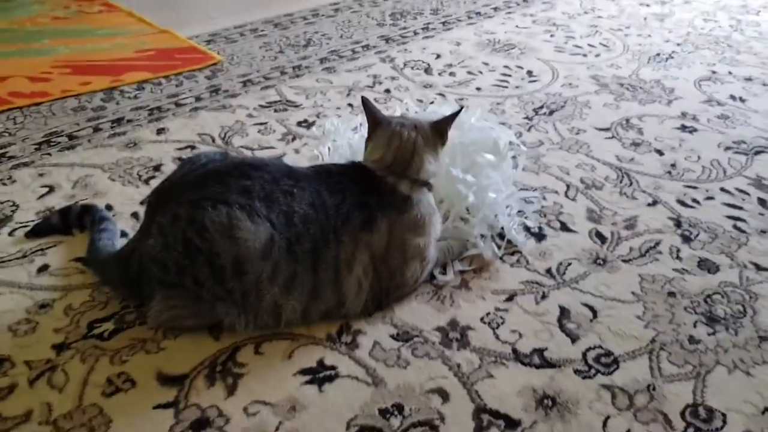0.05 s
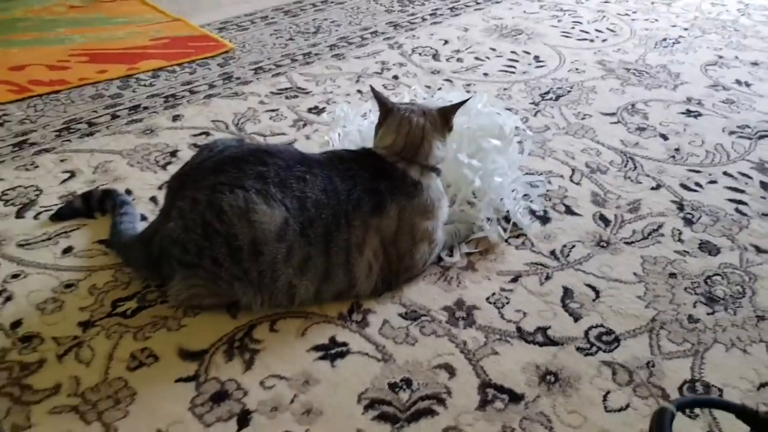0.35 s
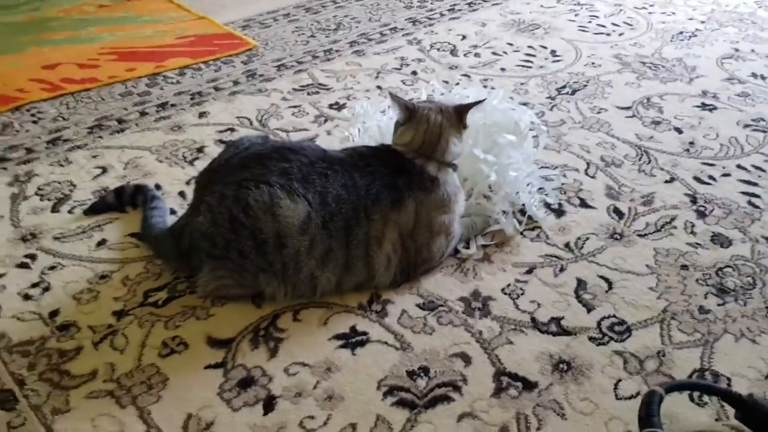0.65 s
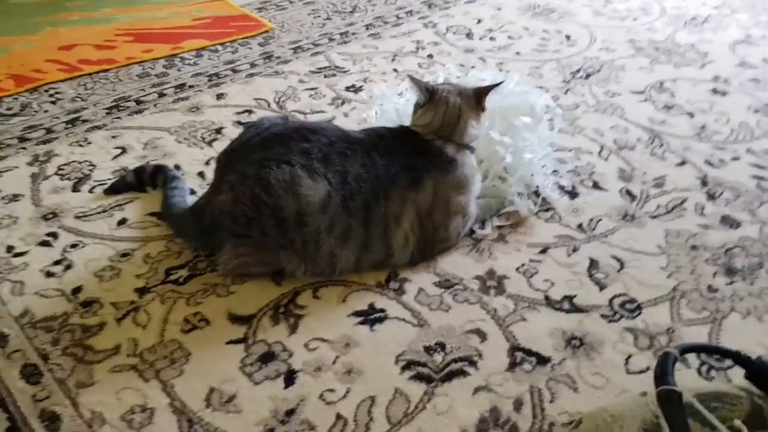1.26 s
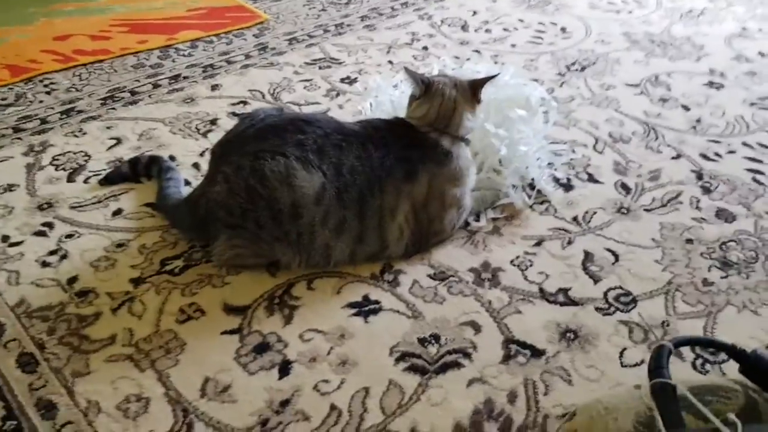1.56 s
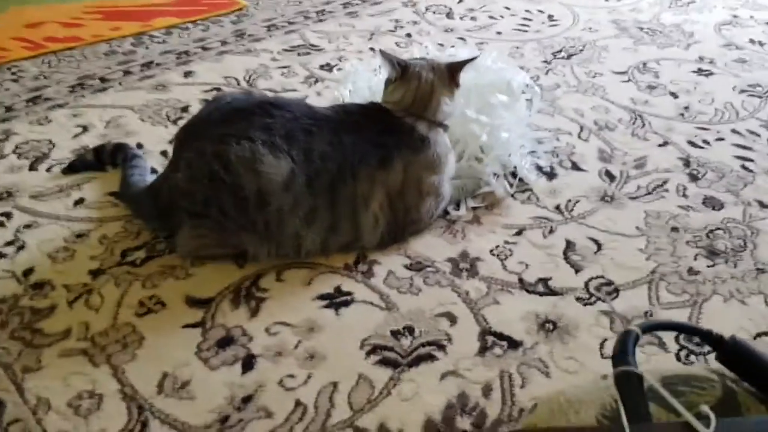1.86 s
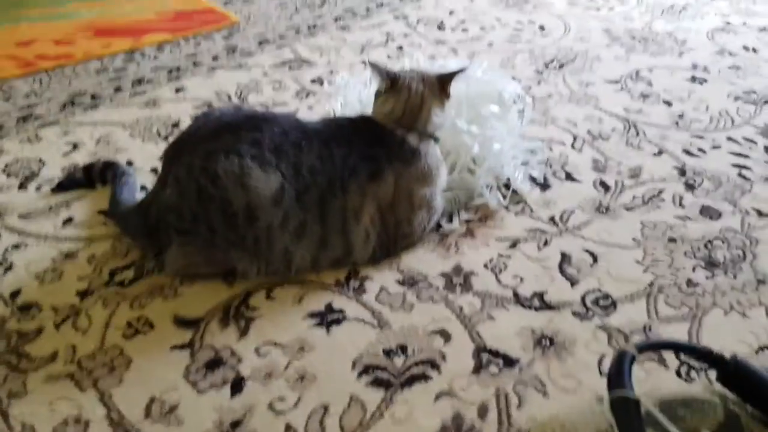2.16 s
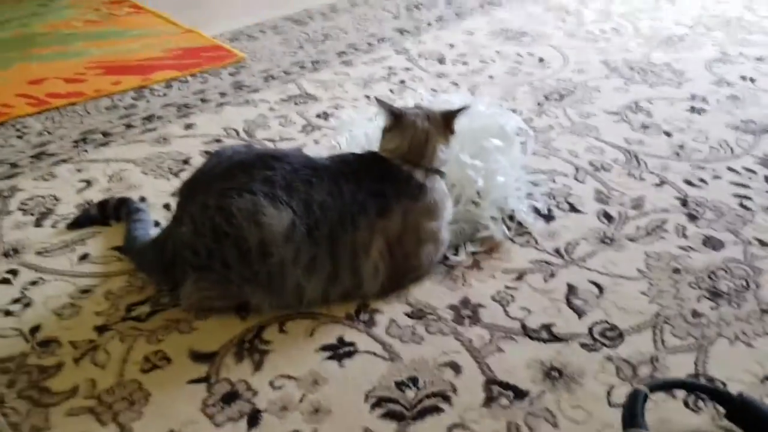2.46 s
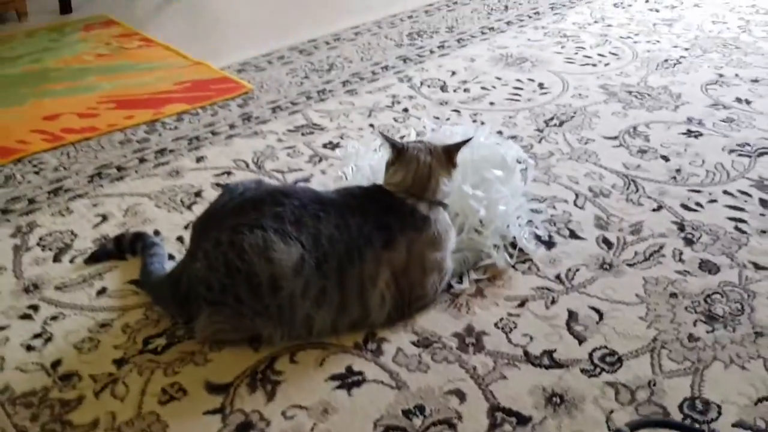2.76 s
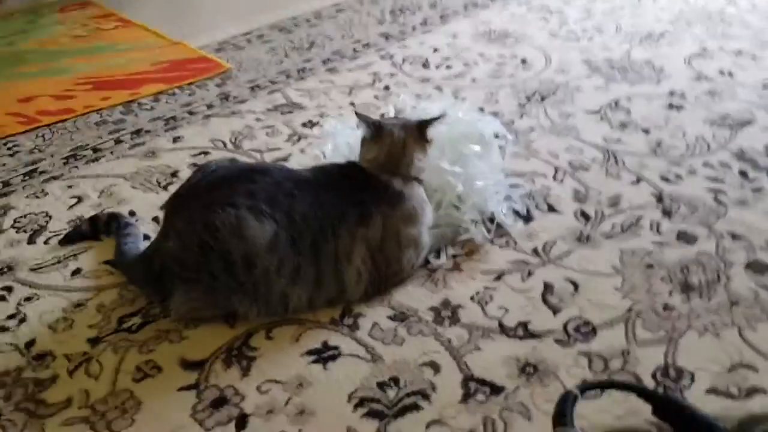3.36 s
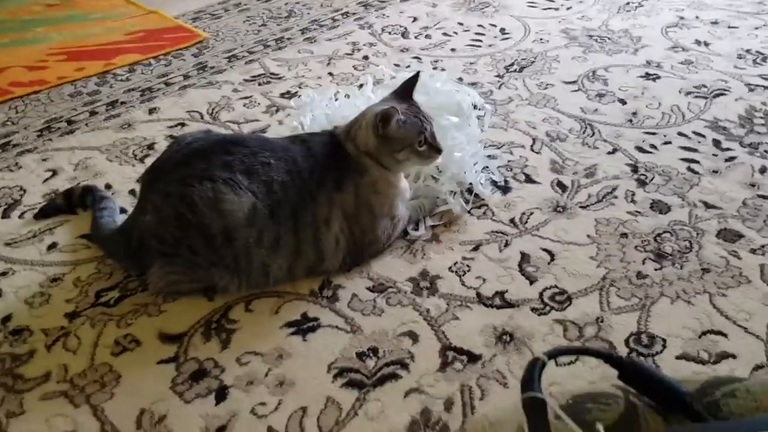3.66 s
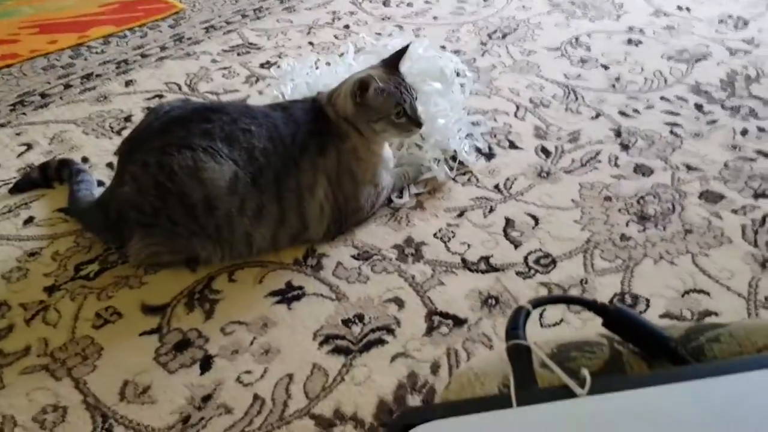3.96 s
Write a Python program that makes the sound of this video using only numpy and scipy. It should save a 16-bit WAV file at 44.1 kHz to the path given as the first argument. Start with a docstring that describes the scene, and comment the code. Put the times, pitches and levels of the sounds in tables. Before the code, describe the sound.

Crinkly packing material rustles close by from the start, with small crackles, soft rubbing and dull low knocks as a cat lies against it. The rustle dies away around 1.8 seconds, leaving a few faint ticks in a quiet carpeted room. From about 3 seconds a second rustle swells to one loud crunch near 3.3 seconds, then fades into light crackles and scrapes by 4 seconds.

```python
"""A quiet carpeted room, close to a cat lying against a heap of crinkly packing material.
A long rustle dies away, a few faint ticks follow, then a second rustle swells to one loud crunch.
The rustle is a swarm of tiny slips between strands. Buckling strands crackle and flicked ones ring.
Dull low knocks and soft rubbing sound close by, over a short echo and faint room tone."""
import sys
import numpy as np
from scipy import signal
from scipy.fft import rfft, irfft
from scipy.io import wavfile
from scipy.ndimage import uniform_filter1d

SR = 44100
rng = np.random.default_rng(int(sys.argv[2]) if len(sys.argv) > 2 else 0)


def transcribe(signal):
    """Save signal, clipped to [-1, 1], as a 16-bit WAV file at the path in sys.argv[1]."""
    frames = np.atleast_2d(signal).T
    limited = np.clip(frames, -1, 1)
    pcm = np.round(limited * 32767).astype(np.int16)
    wavfile.write(sys.argv[1], SR, pcm)


N = 176400
LOW_HZ, TREBLE_HZ = 616, 6770  # low/mid and mid/treble crossovers
SLIDE_RISE_S, SLIDE_FALL_S = 0.0063, 0.0075  # scrapes and rubs


def rustle(flutter_hz=80):
    """Strands rub and scrape over each other; friction catches and lets go many times a second."""
    # Each row: time in seconds, then low, mid and treble level in dB before trim.
    levels = [(0, -36, -30, -32), (0.07, -44.5, -36.5, -48.5), (0.14, -35, -31.5, -37.5),
              (0.28, -41.5, -35, -42.5), (0.345, -41.5, -34.5, -40), (0.45, -33, -36, -46.5),
              (0.58, -37.5, -35, -38), (0.7, -40, -34, -39), (0.898, -42, -39, -44),
              (1.0, -33.5, -33.5, -35), (1.07, -38.5, -34.5, -42.5), (1.25, -33.5, -32, -38),
              (1.55, -39.5, -32, -36.5), (1.64, -35, -32, -38), (1.71, -48, -42, -50),
              (1.77, -50, -49, -57), (1.807, -52, -42, -51), (1.88, -57.5, -63, -72.5),
              (2.201, -58.5, -56.5, -65.5), (2.4, -59, -61.5, -74), (2.56, -57, -54, -59.5),
              (2.72, -53, -50, -55), (2.78, -54, -52.5, -63.5), (2.99, -46.5, -52, -60.5),
              (3.03, -50, -45.5, -60.5), (3.13, -44.5, -51, -65.0), (3.21, -38.5, -32.5, -41.6),
              (3.31, -35.5, -31.5, -35.5), (3.353, -28.5, -17.5, -26), (3.389, -30, -25.5, -31),
              (3.45, -34, -28.5, -33.5), (3.498, -42, -36.5, -41.5), (3.59, -47.5, -44.5, -52),
              (3.71, -48.5, -41.5, -54), (3.88, -41.5, -45, -55), (3.92, -55.5, -50, -60.5),
              (3.99, -52, -57, -73)]
    # Each row: start in seconds, length in seconds, mid and treble level in dB before trim.
    scrapes = [(0.187, 0.055, -38.5, -46), (0.36, 0.039, -27, -32), (0.467, 0.065, -30.5, -34),
               (0.984, 0.013, -47, -41), (1.933, 0.065, -60, -69), (3.605, 0.046, -43.5, -42.5),
               (3.752, 0.1, -42, -43)]
    trims_db, flutters_db = (-1.5, -3, 1.5), (2.44, 1.02, 1.24)  # low, mid, treble
    times, *bands_db = np.transpose(levels)
    t, catch = np.arange(N) / SR, wobble(flutter_hz)
    bands = [band * amp(trim_db + flutter_db * evened(catch + wobble(flutter_hz)))
             for band, trim_db, flutter_db in zip(slips(share=0.35), trims_db, flutters_db)]
    out = sum(band * amp(np.interp(t, times, db)) for band, db in zip(bands, bands_db))
    _, mid, treble = bands
    for start, length, mid_db, treble_db in scrapes:
        shape = burst(length, SLIDE_RISE_S, SLIDE_FALL_S)
        add(out, start, cut(mid, start, shape) * amp(mid_db) + cut(treble, start, shape) * amp(treble_db))
    return out


def slips(share, rate_hz=450, decay_s=0.00052):
    """Tiny slips carry `share` of the power, hiss the rest; gives low, mid and treble at unit rms."""
    # Rustle spectrum. Each row: frequency in Hz, left and right relative level in dB.
    colour = [(30.4, -22, -8), (90.6, 5.5, -1), (232, 2, -0.5), (452, -2, -5), (596, -8.5, -10.5),
              (875, -3, -9), (1350, -1, -4), (1990, -1.5, -3.5), (3100, -3.5, -2), (4380, -3.5, -6.5),
              (5580, -7, -15.5), (6620, -12, -18), (8950, -20.5, -16.5), (11450, -14.5, -17),
              (13100, -13.5, -21.5), (15100, -18, -26.5)]
    # Steady resonances. Each row: centre in Hz, width in Hz, lift in dB.
    resonances = [(427, 85, 1), (503, 38, 4.5), (640, 86, -3.5), (923, 92, 4.5), (3030, 85, -1.5)]
    sizes_db = np.minimum(rng.exponential(1, N), 4)
    impulses = amp(sizes_db) * (rng.random(N) < rate_hz / SR)
    power = signal.lfilter([1], [1, -np.exp(-1 / (decay_s * SR))], impulses ** 2)
    drive = np.sqrt(1 - share + share * power / power.mean()) * rng.standard_normal((2, N))
    lift_db = sum(db * resonance(hz, width_hz) for hz, width_hz, db in resonances)
    colour_db = np.array([curve(colour, column=1), curve(colour, column=2)])
    spectra = paired(patchy(drive)) * amp(lift_db + colour_db)
    over_low, treble = above(LOW_HZ, order=12), above(TREBLE_HZ, order=20)
    bands = (1 - over_low, over_low * (1 - treble), treble)
    return [evened(irfft(spectra * np.sqrt(band), N)) for band in bands]


def patchy(x, depth_db=2.5):
    """Colour shifts as the heap moves: random patches of about 500 Hz by 20 ms, weaker in the bass."""
    hz, _, spectra = signal.stft(x, SR, nperseg=512, noverlap=384)
    field = rng.standard_normal(spectra.shape[:0:-1]).T
    field = uniform_filter1d(field, size=6, axis=0)
    field = evened(uniform_filter1d(field, size=7, axis=1))
    gain = amp(depth_db * field * np.minimum(hz / LOW_HZ, 1)[:, None])
    return signal.istft(spectra * gain, nperseg=512, noverlap=384)[1][:, :N]


def crackles(mid_trim_db=0.5, treble_trim_db=3):
    """A strand buckles: dense snaps build to one sharp peak and die away."""
    # Each row: peak time in seconds, length in seconds, mid and treble level in dB, low cut in Hz.
    buckles = [(0.126, 0.014, -28, -35, 580), (0.153, 0.008, -21, -31, 453),
               (0.1988, 0.0075, -24, -25.5, 895), (0.311, 0.0038, -23, -28.5, 710),
               (0.384, 0.0035, -19.5, -23.5, 400), (0.421, 0.013, -25, -36, 600),
               (0.6222, 0.0029, -19, -22, 1500), (0.64, 0.01, -22.5, -26.5, 1800),
               (0.767, 0.016, -33, -51, 900), (0.85, 0.003, -31, -32.5, 1550),
               (0.979, 0.0033, -23.5, -25, 1520), (1.101, 0.0064, -29, -33.5, 700),
               (1.1243, 0.0046, -25.5, -28, 2070), (1.226, 0.0033, -24, -35, 596),
               (1.2904, 0.00082, -12, -47, 1200), (1.34, 0.0023, -20.5, -41, 1500),
               (1.575, 0.0052, -20, -50, 407), (1.5845, 0.0024, -28, -25, 2000),
               (1.601, 0.0015, -11.5, -11.5, 2400), (1.605, 0.0058, -19.5, -49, 500),
               (1.614, 0.0058, -26, -25.5, 960), (2.442, 0.0036, -37, -46.5, 3040),
               (2.495, 0.0018, -38, -50, 1790), (2.7, 0.006, -36, -44, 900), (3.154, 0.0024, -43, -53, 500),
               (3.318, 0.001, -20, -17.5, 795), (3.324, 0.0051, -11.5, -17, 403),
               (3.3384, 0.0091, -11, -19.5, 420), (3.447, 0.0045, -24, -35.7, 820),
               (3.458, 0.003, -20.5, -29, 1100), (3.5725, 0.0016, -34, -33, 1390),
               (3.713, 0.0022, -29.5, -32, 4050), (3.731, 0.002, -32, -32, 4000),
               (3.799, 0.0024, -31, -36, 1800), (3.8625, 0.0037, -27.5, -42, 1200),
               (3.871, 0.0054, -30.5, -39.5, 1500)]
    build, fade = 0.38, 0.7  # time constants, as shares of the length
    low, mid, treble = slips(share=0.044)
    out, low_mid = np.zeros((2, N)), mid + 1.4 * low
    for peak, length, mid_db, treble_db, low_cut_hz in buckles:
        t = np.arange(-2 * length, 2 * np.pi * length, 1 / SR)
        start = peak + t[0]
        shape = np.exp(np.minimum(t / build, -t / fade) / length)
        body = high_passed(cut(low_mid, start, np.ones(SR // 10 + len(t))), low_cut_hz)
        add(out, start, cut(body, 0, shape) * amp(mid_db + mid_trim_db))
        add(out, start, cut(treble, start, shape) * amp(treble_db + treble_trim_db))
    return out


def bumps(rise_s=0.0021, damping_cycles=3.03, damping_s=0.013, sag=0.014, trim_db=-0.5):
    """Soft knocks: a few low cycles, sagging slightly in pitch, with a noisy thud."""
    # Each row: start in seconds, level in dB, pitch in Hz.
    knocks = [(0.148, -17.5, 415), (0.308, -25.5, 280), (0.384, -22.5, 398), (0.398, -23.5, 333),
              (0.416, -20.5, 486), (0.492, -15, 324), (0.562, -21, 178), (0.641, -22, 400),
              (0.705, -23.5, 390), (0.954, -23.5, 201), (1.19, -23.5, 434), (1.226, -20.5, 180),
              (1.291, -14, 480), (1.338, -17.5, 443), (1.469, -20.5, 450), (1.547, -17, 268),
              (1.57, -14, 162), (1.64, -14.5, 420), (1.677, -16.5, 433), (2.783, -38, 107),
              (2.972, -28, 110), (3.167, -28.5, 111), (3.298, -18.5, 290), (3.323, -9.5, 406),
              (3.337, -5, 495), (3.412, -17.5, 234)]
    out, t = np.zeros((2, N)), np.arange(SR // 12) / SR
    rumble = slips(share=0)[0]
    for start, db, hz in knocks:
        fade = np.exp(-t * hz / damping_cycles - t / damping_s)
        shape = np.minimum(t / rise_s, 1) * fade
        pitch_hz = hz * (1 + sag * (fade - .5))
        ring = np.sin(2 * np.pi * np.cumsum(pitch_hz) / SR) * pan(left_db=1.25)
        thud = high_passed(cut(rumble, start, np.ones(len(t))), hz / 2)
        add(out, start, amp(db + trim_db) * shape * (ring + 0.48 * thud))
    return out


def taps(rise_s=0.00017, fall_s=0.004, trim_db=1):
    """A flicked strand rings for a few milliseconds, with separate grit on each side."""
    # Each row: start in seconds, level in dB, pitch in Hz.
    flicks = [(0.123, -23, 987), (0.148, -21, 2910), (0.404, -20.5, 1506), (0.624, -22.5, 1794),
              (0.2, -25, 2960), (1.291, -22.5, 3780), (1.293, -20, 932), (1.605, -18.5, 1406),
              (2.968, -38, 1030), (2.968, -39.5, 1640), (3.417, -24, 1930), (3.457, -16.5, 1600),
              (3.531, -31.5, 1270), (3.572, -30.5, 1940), (3.755, -31, 1380), (3.83, -34.5, 1930),
              (3.86, -29, 1810)]
    out, shape = np.zeros((2, N)), burst(rise_s, rise_s, fall_s)
    t = np.arange(len(shape)) / SR
    grit = evened(uniform_filter1d(rng.standard_normal((2, N)), size=130))
    for start, db, hz in flicks:
        ring = np.sin(2 * np.pi * hz * t) * pan(left_db=0.9)
        add(out, start, amp(db + trim_db) * ring * (shape + 0.98 * cut(grit, start, shape)))
    return out


def rubs(width_hz=190):
    """Soft rubbing: friction noise in one low, hollow resonance."""
    # Each row: start in seconds, length in seconds, level in dB, pitch in Hz.
    strokes = [(0.358, 0.038, -38, 380), (3.006, 0.084, -49, 720), (3.336, 0.012, -20.5, 430)]
    out, friction = np.zeros((2, N)), paired(rng.standard_normal((2, N)))
    for start, length, db, hz in strokes:
        hollow = evened(irfft(friction * resonance(hz, width_hz), N))
        add(out, start, amp(db) * cut(hollow, start, burst(length, SLIDE_RISE_S, SLIDE_FALL_S)))
    return out


def placed(x, right_lag_s=0.00017):
    """Sound from the left reaches the right side later; the balance drifts."""
    # Each row: time in seconds, gain in dB added on the left and taken off the right.
    balance = [(0, -0.54), (1.7, 0.3), (2.45, 0.8), (2.8, 2), (3.2, 0.4), (3.7, -1.1)]
    left_db = np.interp(np.arange(N) / SR, *np.transpose(balance))
    right = irfft(rfft(x[1]) * np.exp(-2j * np.pi * bins() * right_lag_s), N)
    return np.array([x[0], right]) * pan(left_db)


def echo(x, t60_s=0.11, level_db=-13):
    """Short, weak tail of a carpeted room."""
    t = np.arange(SR // 3) / SR
    tail = rng.standard_normal((2, len(t))) * amp(-60 * t / t60_s) * (t > .004)
    return amp(level_db) * signal.fftconvolve(x, tail / np.linalg.norm(tail[0]), axes=1)[:, :N]


def room_tone(level_db=-59):
    """Faint steady air of the room."""
    # Each row: frequency in Hz, relative spectral density in dB.
    density = [(15, -42), (25, -8), (96, -0.5), (331, -8), (750, -3.5), (1300, -12.5), (2300, -11),
               (8580, -69), (15500, -39)]
    spectra = paired(rng.standard_normal((2, N))) * amp(curve(density))
    return amp(level_db) * evened(irfft(spectra, N))


def paired(x):
    """Stereo spectra from two unrelated signals, alike in the bass as at two nearby points."""
    # Each row: frequency in Hz, left-right correlation from 0 to 1.
    likeness = [(60, 0.92), (150, 0.94), (330, 1), (700, 0.55), (1450, 0.38), (3100, 0.13), (7000, 0.03)]
    left, other = rfft(x)
    same = np.clip(curve(likeness), -.99, .99)
    return np.array([left, same * left + np.sqrt(1 - same ** 2) * other])


def amp(db):
    """Decibels to gain."""
    return 10 ** (np.asarray(db) / 20)


def pan(left_db):
    """Stereo gains: left up, right down by as much."""
    return amp(np.vstack([left_db, -left_db]))


def evened(x):
    """Scales to unit rms."""
    return x / np.sqrt(np.mean(x ** 2) + 1e-20)


def bins():
    """Bin frequencies in Hz of a full-length spectrum."""
    return np.arange(N // 2 + 1) * SR / N


def curve(points, column=1):
    """A table column interpolated over log frequency."""
    table = np.array(points)
    return np.interp(np.log(bins() + 1), np.log(table[:, 0] + 1), table[:, column])


def resonance(hz, width_hz):
    """Spectral peak of unit height."""
    return 1 / (1 + (2 * (bins() - hz) / width_hz) ** 2)


def above(hz, order):
    """High-pass power response."""
    return 1 - 1 / (1 + (bins() / hz) ** order)


def high_passed(x, hz):
    """High-pass, scaled to unit rms."""
    return evened(signal.sosfilt(signal.butter(4, hz, "high", fs=SR, output="sos"), x))


def wobble(hz):
    """Unit-rms noise, low-passed at hz."""
    return evened(irfft(rfft(rng.standard_normal(N)) * np.sqrt(1 - above(hz, order=4)), N))


def burst(length_s, rise_s, fall_s):
    """Envelope: linear rise, hold until length_s, exponential fall."""
    t = np.arange(0, length_s + 6 * fall_s, 1 / SR)
    return np.minimum(t / rise_s, 1) * np.exp(-np.maximum(t - length_s, 0) / fall_s)


def cut(x, start_s, shape):
    """A stretch of stereo sound under an envelope."""
    first = round(start_s * SR)
    return x[:, first:][:, :len(shape)] * shape[:N - first]


def add(mix, start_s, sound):
    """Mixes in a stereo sound."""
    part = mix[:, max(round(start_s * SR), 0):][:, :sound.shape[1]]
    part += sound[:, :part.shape[1]]


def scene():
    """Rustle, rubs, crackles, taps and bumps in the room."""
    near = placed(rustle() + rubs() + crackles() + taps() + bumps())
    return near + echo(near) + room_tone()


def record(dry):
    """Bass roll-off, full-scale clip, band limit."""
    low_cut_hz, high_cut_hz = 18, 15900
    thinned = signal.sosfilt(signal.butter(2, low_cut_hz, "high", fs=SR, output="sos"), dry)
    low_pass = signal.firwin(511, high_cut_hz, window=("kaiser", 9), fs=SR)
    return signal.oaconvolve(np.clip(thinned, -1, 1), low_pass[None], "same")


dry = scene()
out = record(dry)
transcribe(out)
```